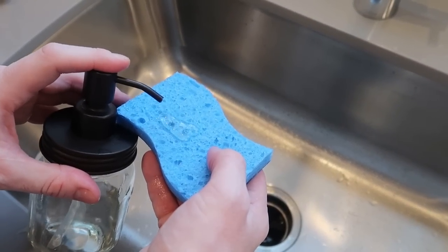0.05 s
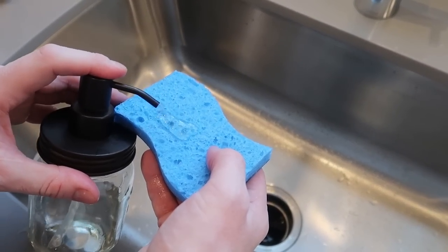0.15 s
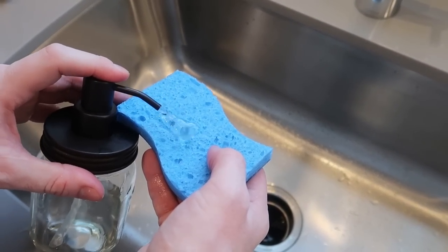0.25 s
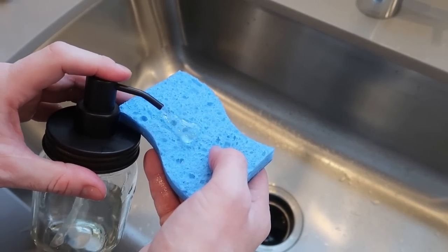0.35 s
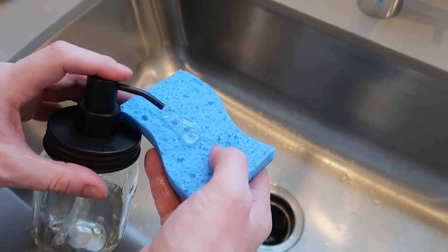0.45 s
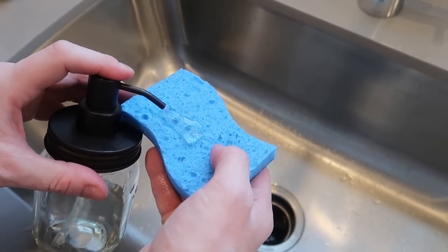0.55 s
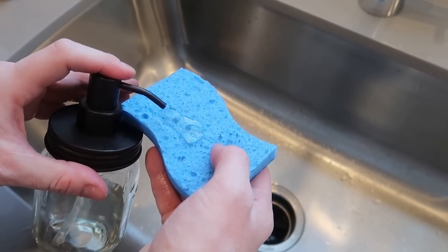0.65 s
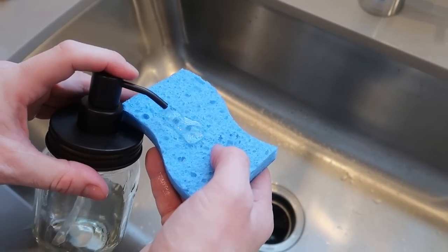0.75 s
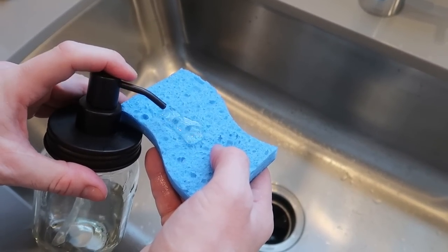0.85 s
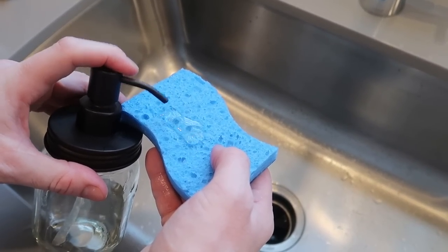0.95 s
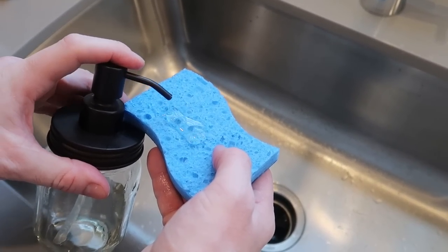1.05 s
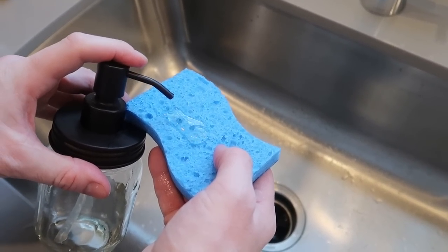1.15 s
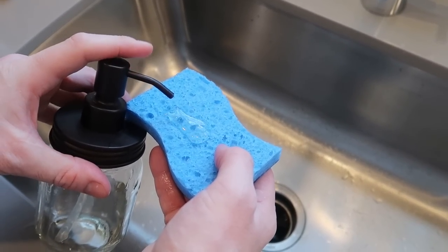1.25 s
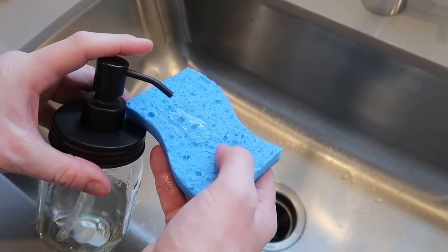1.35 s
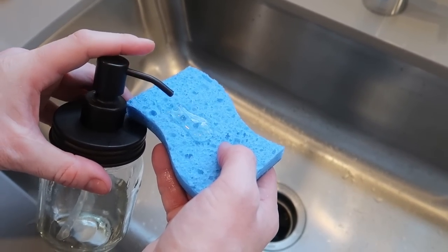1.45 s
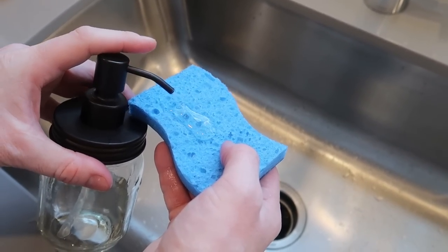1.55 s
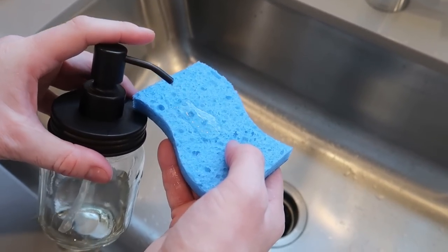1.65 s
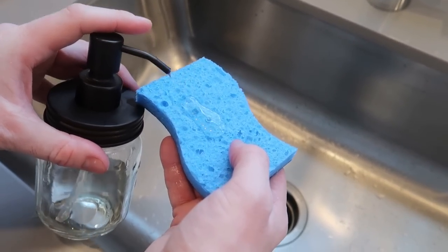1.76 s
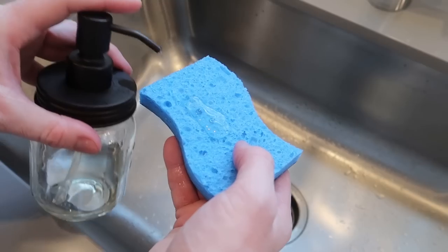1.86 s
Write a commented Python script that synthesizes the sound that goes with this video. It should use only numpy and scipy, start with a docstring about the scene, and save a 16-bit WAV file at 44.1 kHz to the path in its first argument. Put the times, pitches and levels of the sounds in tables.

```python
"""A steady hum and soft room noise, then plastic clicks and metallic knocks in bursts: a pump on a glass jar
is pressed at the rim of a steel sink. Clicks are noise bursts through pump-head resonances. Knocks are
decaying sines of the basin, a low panel that swells late and beats, a hollow note and gritty noise. Cracks and
glass pings are decaying sines; an appliance hums as wavering lines; a small hard kitchen adds a short tail."""
import sys
import numpy as np
from scipy import signal
from scipy.fft import rfft, irfft
from scipy.io import wavfile

SR = 44100
rng = np.random.default_rng(int(sys.argv[2]) if len(sys.argv) > 2 else 0)


def master(y):
    """Save y as 16-bit WAV."""
    cut = np.clip(np.atleast_2d(y).T, -1, 1)
    pcm = np.round(cut * 32767)  # scale
    wavfile.write(sys.argv[1], SR, pcm.astype(np.int16))


N = 83790


def undb(db):
    """dB to gain."""
    return 10 ** (np.asarray(db) / 20)


def unit(x):
    """Scale to rms 1."""
    return x / np.sqrt(np.mean(x ** 2))


def band(x, hz, width_hz):
    """Two-pole resonance with gain 1 at the centre."""
    b, a = signal.iirpeak(hz, hz / width_hz, fs=SR)
    return signal.lfilter(b, a, x)


def decay(t, t60_s):
    """Exponential envelope, down 60 dB after t60_s."""
    return 1000. ** (-t / t60_s)


def ring(hz, t60_s, size=SR // 2):
    """Struck mode: a decaying sine."""
    t = np.arange(size) / SR
    return np.sin(2 * np.pi * hz * t) * decay(t, t60_s)


def rise(x, tau_s):
    """Soft onset with time constant tau_s."""
    return x * (1 - np.exp(-np.arange(len(x)) / (tau_s * SR)))


def add(out, start_s, sound):
    """Mix a sound in at start_s."""
    i = int(start_s * SR)
    out[i:i + len(sound)] += sound[:len(out) - i]


def curve(table):
    """Gain on the FFT bins, interpolated in dB over log frequency."""
    hz, db = np.array(table, float).T
    bins_hz = np.fft.rfftfreq(N, 1 / SR)
    return undb(np.interp(np.log(bins_hz + 1), np.log(hz), db))


# Spectrum of the room air. Each row: frequency in Hz, relative density in dB per Hz.
AIR_SPECTRUM = [(15, -19), (25, -11), (119, -2), (204, -18.5), (297, -9.5), (331, -15), (457, -15.5),
                (509, -19.5), (848, -24.5), (2770, -31.5), (8000, -41.5), (11500, -48), (13000, -52),
                (15500, -57)]
# Width of the air before the lagging share is added. Each row: frequency in Hz, side minus mid in dB.
AIR_WIDTH = [(60, -70), (110, -24), (200, -7.5), (380, -6), (700, -2.5), (1290, -0.5), (2380, 0.5),
             (4400, 1.5), (8120, -1), (15000, 1)]
# Lines of the appliance hum. Each row: frequency in Hz, rms level in dB, width of the wavering in Hz.
HUM_LINES = [(63.9, -56.5, 12), (242.7, -57, 5.9), (260.6, -67, 17), (297.6, -50.5, 2.7), (462, -64.5, 16),
             (483.5, -66, 13), (843, -66.5, 15)]
AIR_MID_RMS_DB = -49
AIR_LAG_SHARE = 0.59  # part of mid put in side a quarter cycle late, so the left port lags


def air():
    """Shaped noise, common in the bass and wide in the treble, plus hum: sines with narrow noise around them."""
    mid_bins = rfft(rng.standard_normal(N)) * curve(AIR_SPECTRUM)
    own_side_bins = rfft(rng.standard_normal(N)) * curve(AIR_SPECTRUM)
    side_bins = (own_side_bins - 1j * AIR_LAG_SHARE * mid_bins) * curve(AIR_WIDTH)
    mid = irfft(mid_bins, N)
    scale = undb(AIR_MID_RMS_DB) / np.std(mid)
    mid = mid * scale
    side = irfft(side_bins, N) * scale
    t = np.arange(N) / SR
    for hz, rms_db, width_hz in HUM_LINES:
        steady = np.sin(2 * np.pi * hz * t)
        waver = unit(band(rng.standard_normal(N), hz, width_hz))
        mid = mid + undb(rms_db) * unit(steady + 0.46 * waver)
    return np.array([mid + side, mid - side])


# Plastic clicks of the pump.
# Each row: start in seconds, body level in dB, spring level in dB, top level in dB, decay constant in ms.
CLICK_EVENTS = [(.115, -40.5, -70, -63, 2.2), (.2225, -41, -43, -50, 2.2), (0.224, -26, -30.5, -32, 2.1),
                (.2277, -14.5, -26, -25.5, 1.6), (.2325, -26, -23, -28.5, 1.3),
                (0.238, -34.5, -35, -49, 11), (.258, -35, -50, -64, 4), (.269, -39, -55, -69, 11),
                (0.294, -41, -60, -70, 6.5), (0.3097, -42, -39, -64, 4.5), (0.3108, -29, -54, -60, 1.9),
                (.3152, -26, -28, -48, 0.51), (0.32, -30.5, -58, -67, 7.1), (.842, -43, -58, -70, 2.6),
                (1.053, -53, -41, -66, 2.9), (1.0595, -42, -36, -44, 2.5), (1.07, -38, -64, -50.5, 9.5),
                (1.4932, -39, -50, -77, 3.1), (1.521, -43, -62, -70, 2.2), (1.586, -43.5, -60, -70, 6),
                (1.717, -42.5, -59, -70, 2.4)]
# Resonances of the pump head: body, spring and top.
# Each row: frequency in Hz, width in Hz of the first of two passes, gain in dB.
BODY_MODES = [(1500, 550, -15), (2090, 730, -5), (3075, 260, 3.5), (3647, 860, 0.5), (4400, 2000, -21)]
SPRING_MODES = [(4920, 320, -7), (6090, 610, 1), (8700, 2800, -8)]
TOP_MODES = [(12000, 2000, -17), (11840, 1620, 5), (14200, 1200, -4)]


def clicks():
    """Short decaying noise bursts excite three groups of pump-head resonances."""
    drives = np.zeros((3, N))
    noise = rng.standard_normal((len(CLICK_EVENTS), 2000))
    for (start_s, *levels_db, decay_ms), grain in zip(CLICK_EVENTS, noise):
        burst = grain * np.exp(-np.arange(len(grain)) / (decay_ms * SR / 1000))
        # set the energy to that of the bare envelope
        burst = burst * np.sqrt(decay_ms * SR / 2000 / np.sum(burst ** 2))
        for drive, db in zip(drives, levels_db):
            add(drive, start_s, undb(db) * burst)
    out = np.zeros(N)
    for drive, modes in zip(drives, (BODY_MODES, SPRING_MODES, TOP_MODES)):
        for hz, width_hz, db in modes:
            out += undb(db) * band(band(drive, hz, width_hz), hz, 2 * width_hz)
    return out


# Knocks of the jar on the rim.
# Each row: start in seconds, basin level in dB, panel level in dB, contact in ms, hollow note in Hz,
# hollow level in dB, hollow t60 in seconds, grit level in dB.
KNOCK_EVENTS = [(.148, -37.5, -33, 1.84, 537, -46, 0.056, -50),
                (.178, -46, -25.5, 0.66, 550, -39, 0.12, -53),
                (.192, -73, -27, 0.33, 1254, -43.5, 0.04, -68),
                (0.2263, -37, -21, 0.38, 1063, -28.5, 0.053, -46),
                (.2305, -39.5, -33, 1.05, 593, -23.5, 0.048, -47),
                (0.234, -34, -47, 0.98, 234.7, -16.5, 0.072, -35),
                (0.261, -32, -20, 2.3, 577, -12.5, 0.045, -40),
                (0.279, -36.5, -39, 1.87, 576, -46, .08, -44), (0.297, -33, -36, 1.4, 581, -22, 0.067, -35),
                (0.3153, -26, -23, 0.24, 960, -24, 0.058, -28.5),
                (.3175, -34.5, -31, 0.68, 339.3, -20, 0.25, -19),
                (.330, -58, -20.5, 0.93, 870, -23, 0.065, -51),
                (.345, -35, -61, 0.57, 1264, -39, 0.053, -40),
                (0.838, -50.5, -39, 0.93, 1010, -34, 0.053, -42.5),
                (0.844, -56, -47.5, 0.62, 204, -29, 0.031, -57),
                (1.0587, -40, -30.5, 0.33, 1044, -25.5, 0.056, -37),
                (1.070, -35.5, -37.5, 0.9, 285, -29, 0.022, -43),
                (1.080, -43.5, -26, 0.64, 1150, -49, .1, -46),
                (1.257, -57, -55, 0.74, 978, -37, .05, -38.5),
                (1.262, -41, -48, 0.94, 550, -30.5, .06, -34),
                (1.268, -43.5, -68, 0.42, 1373, -43, 0.037, -57),
                (1.288, -49.5, -65, 0.76, 577, -49, .06, -44.5),
                (1.384, -54, -59, 0.21, 920, -60, 0.055, -51),
                (1.396, -48.5, -48, 0.59, 1000, -48, 0.041, -44.5),
                (1.604, -52, -45, 0.61, 542, -33, 0.09, -42),
                (1.609, -36, -36, 0.7, 703, -24, 0.039, -44.5)]
# Basin modes, shifted a little at random per knock. Each row: frequency in Hz, level in dB, t60 in seconds.
BASIN_MODES = [(176, -9, 0.34), (236, -3.5, 0.23), (244.4, -2, 0.15), (296, 0.5, 0.19), (338.7, -7.5, 0.31),
               (378, -11.5, 0.21), (464, -6, 0.15), (553, -8.5, 0.21), (601.7, -1, 0.062), (762, -6, 0.053),
               (916, -11.5, 0.21), (1026, -25, 0.14), (1140, -8, 0.062), (1400, -16.5, 0.029),
               (1580, -43, 0.11), (1940, -9, 0.076)]
PANEL_HZ, PANEL_SPLIT_HZ, PANEL_T60_S = 114.56, 9.36, 0.38
HOLLOW_SPLIT_HZ = 10.3  # the hollow note is a close pair that beats
GRIT_HZ, GRIT_WIDTH_HZ, GRIT_T60_S = 1150, 1000, 0.044  # many small modes of rim and counter
KNOCK_RISE_S = 0.001


def panel_swell():
    """Two close modes struck in opposition cancel at first, then swell and beat."""
    upper = ring(PANEL_HZ + PANEL_SPLIT_HZ / 2, PANEL_T60_S)
    lower = ring(PANEL_HZ - PANEL_SPLIT_HZ / 2, PANEL_T60_S)
    return upper - lower


def basin_ring(spot):
    """Sum of modes with alternating sign; spot holds the random level and pitch shift of each."""
    out = 0
    for k, (hz, db, t60_s) in enumerate(BASIN_MODES):
        mode = ring(hz * (1 + 0.012 * spot[k, 1]), t60_s)
        out = out + (-1) ** k * undb(db + 2.2 * spot[k, 0]) * mode
    return out


def knocks():
    """A contact push smooths basin, hollow note and grit; the panel swells beside them."""
    out = np.zeros(N)
    spots = rng.standard_normal((len(KNOCK_EVENTS), len(BASIN_MODES), 2))
    panel = panel_swell()
    t = np.arange(len(panel)) / SR
    noise = rng.standard_normal((len(KNOCK_EVENTS), len(t)))
    grits = unit(band(noise, GRIT_HZ, GRIT_WIDTH_HZ)) * decay(t, GRIT_T60_S)
    for row, spot, grit in zip(KNOCK_EVENTS, spots, grits):
        start_s, basin_db, panel_db, contact_ms, hollow_hz, hollow_db, hollow_t60_s, grit_db = row
        push = np.hanning(int(contact_ms * SR / 1000) + 3)
        hollow = ring(hollow_hz, hollow_t60_s) * np.cos(np.pi * HOLLOW_SPLIT_HZ * t)
        hit = undb(basin_db) * basin_ring(spot) + undb(hollow_db) * hollow + undb(grit_db) * grit
        pushed = signal.fftconvolve(hit, push / push.sum())[:len(t)]
        add(out, start_s, rise(pushed, KNOCK_RISE_S) + undb(panel_db) * panel)
    return out


# Hard cracks of the plunger on its stops.
# Each row: start in seconds, level in dB, frequency in Hz, t60 in seconds.
CRACK_EVENTS = [(.3154, -15, 1250, .008), (.3155, -24, 3100, .010), (.2262, -30, 1350, .02)]


def cracks():
    """Short dry snaps: sines that die within milliseconds."""
    out = np.zeros(N)
    for start_s, db, hz, t60_s in CRACK_EVENTS:
        add(out, start_s, undb(db) * ring(hz, t60_s))
    return out


# Pings of the jar. Each row: start in seconds, level in dB.
PING_EVENTS = [(.229, -48), (1.0668, -40), (1.0745, -60), (1.086, -48)]
# Modes of the glass. Each row: frequency in Hz, level in dB, t60 in seconds.
GLASS_MODES = [(3025, -22, .05), (4081, -12, .07), (5380, -5, .17), (6050, -12, .05), (6573, 0, .045),
               (7682, -12, .06), (8947, -16, .05)]
PING_RISE_S = 0.0022


def pings():
    """The glass jar rings thinly: high decaying modes with a soft onset."""
    out = np.zeros(N)
    glass = sum(undb(db) * ring(hz, t60_s) for hz, db, t60_s in GLASS_MODES)
    for start_s, db in PING_EVENTS:
        add(out, start_s, undb(db) * rise(glass, PING_RISE_S))
    return out


def ports(x, lag_us, pan_db):
    """Left and right: the right port hears later, and softer by pan_db where that is above zero."""
    hz = np.fft.rfftfreq(N, 1 / SR)
    late = irfft(rfft(x) * np.exp(-2j * np.pi * hz * lag_us * 1e-6), N)
    return np.array([x * undb(pan_db / 2), late * undb(-pan_db / 2)])


def cut(x, hz, kind):
    """Second-order low or high pass."""
    return signal.sosfilt(signal.butter(2, hz, kind, fs=SR, output="sos"), x)


def tail(noise, t, t60_s):
    """Decaying noise; the factor makes its nominal energy 1."""
    return noise * decay(t, t60_s) * np.sqrt(2 * np.log(1000) / (t60_s * SR))


ROOM_DB, ROOM_T60_S = -3, 0.27
SHEEN_DB, SHEEN_T60_S = -14, 0.079
ROOM_SPLIT_HZ = 1090  # dark tail below, sheen above


def room(dry):
    """Convolution with a dark tail alike at both ports and a short wide treble sheen."""
    t = np.arange(SR // 2) / SR
    noise = rng.standard_normal((3, len(t))) * (t > .003)  # tail starts after 3 ms
    dark = undb(ROOM_DB) * cut(tail(noise[0], t, ROOM_T60_S), ROOM_SPLIT_HZ, "low")
    sheen = undb(SHEEN_DB) * cut(tail(noise[1:], t, SHEEN_T60_S), ROOM_SPLIT_HZ, "high")
    sent = cut(dry, 227, "high")
    return signal.fftconvolve(sent[None], dark + sheen)[:, :N]


def scene():
    """Direct sound at two ports, the room tail, the air and hum."""
    low = knocks() + cracks()
    high = clicks() + pings()
    direct = ports(low, lag_us=70, pan_db=0) + ports(high, lag_us=24, pan_db=1.8)
    return direct + room(low + high) + air()


def record(dry):
    """Steep elliptic low-pass at 15.4 kHz: 0.2 dB ripple, 80 dB rejection."""
    return signal.sosfilt(signal.ellip(10, .2, 80, 15400, fs=SR, output="sos"), dry)


dry = scene()
out = record(dry)
master(out)
```